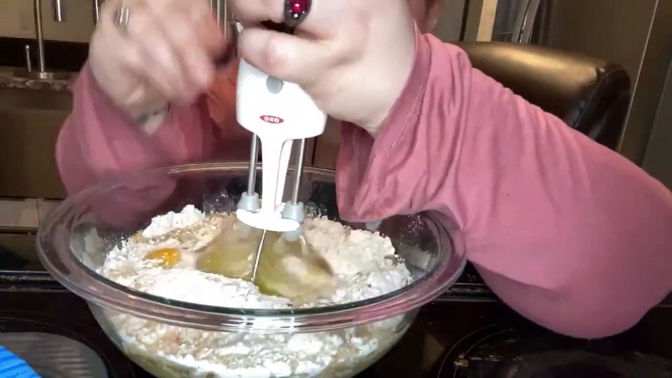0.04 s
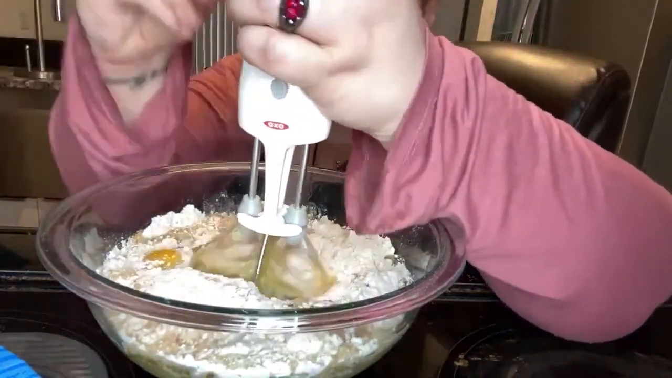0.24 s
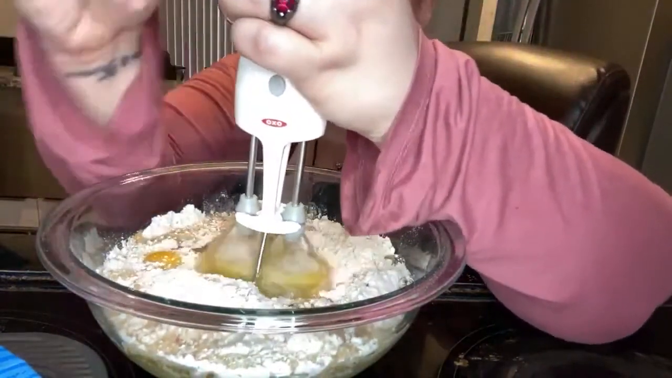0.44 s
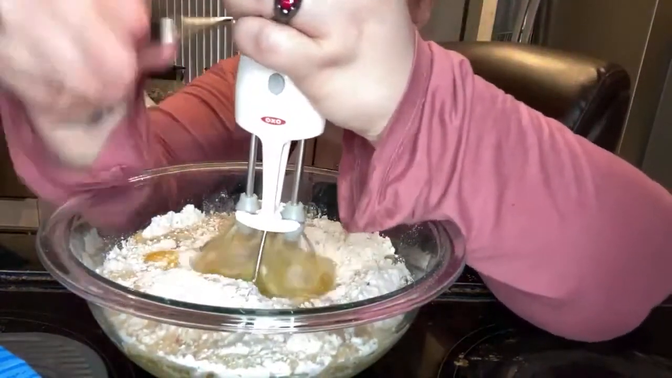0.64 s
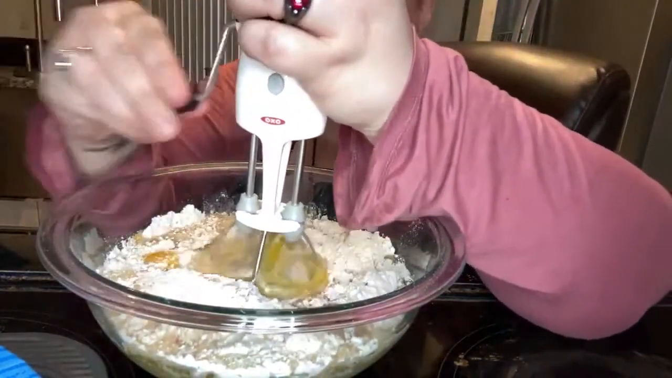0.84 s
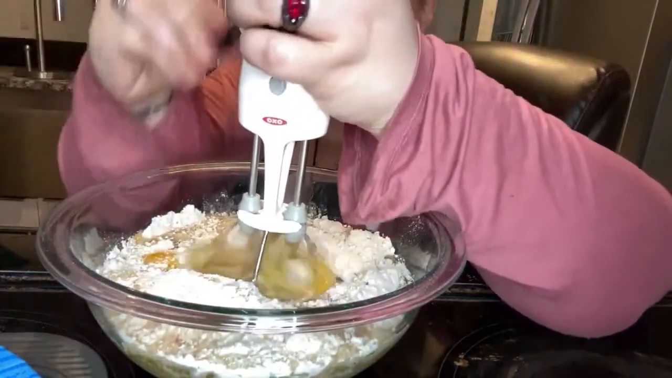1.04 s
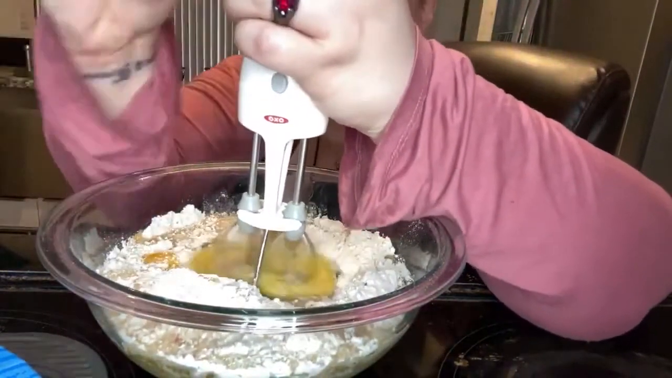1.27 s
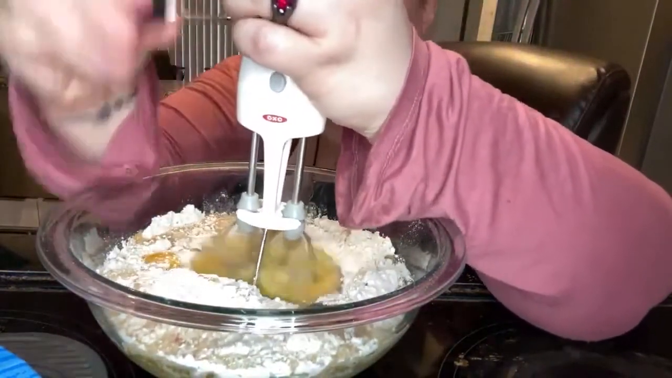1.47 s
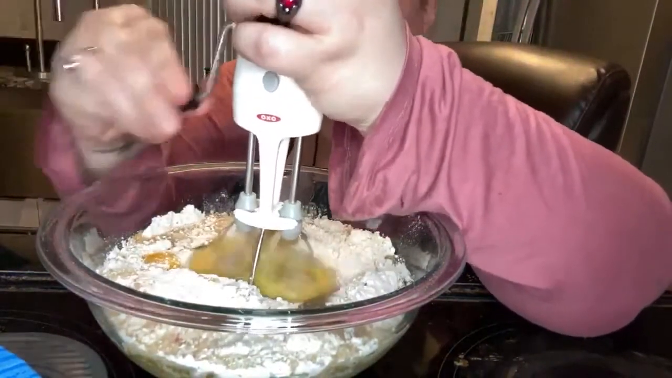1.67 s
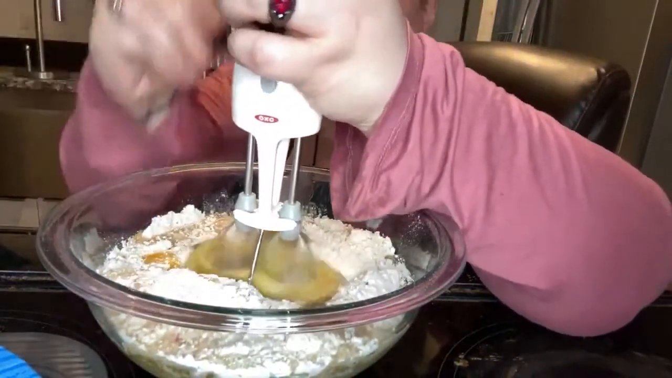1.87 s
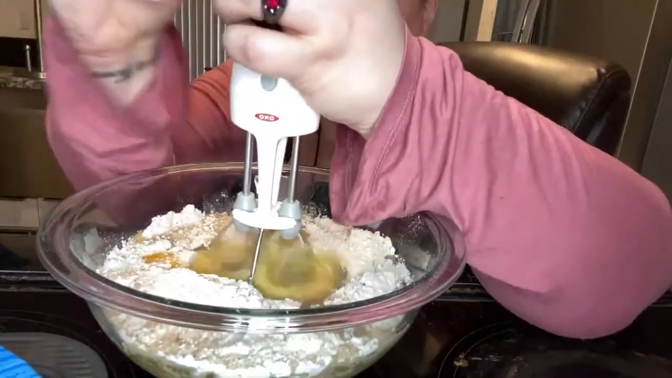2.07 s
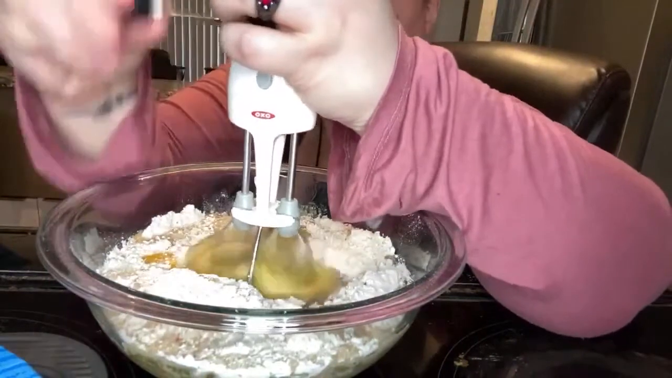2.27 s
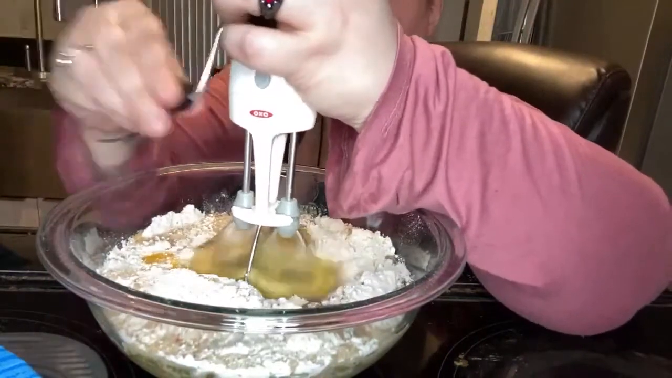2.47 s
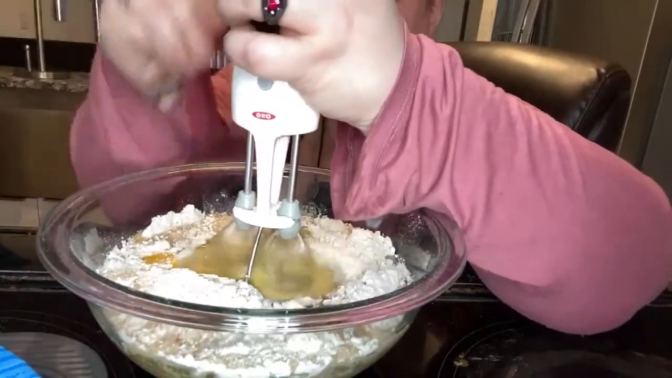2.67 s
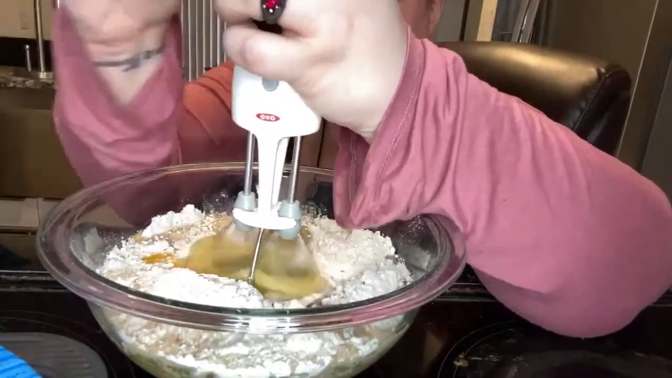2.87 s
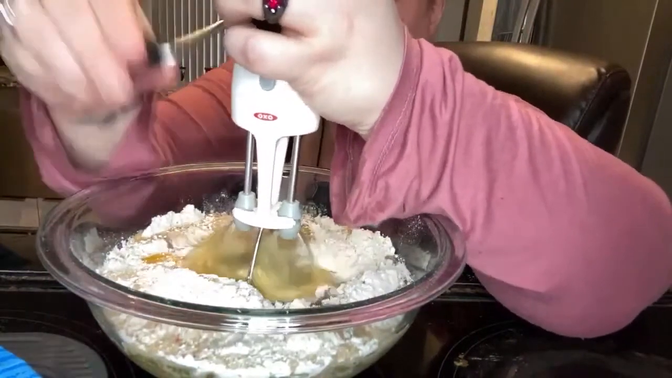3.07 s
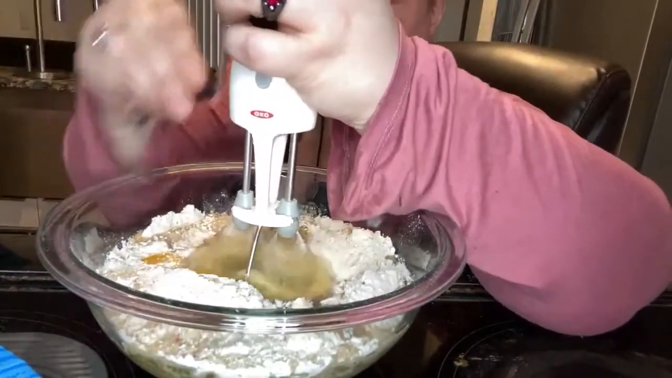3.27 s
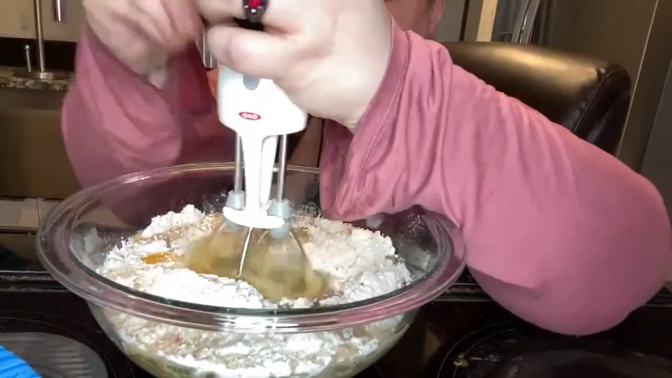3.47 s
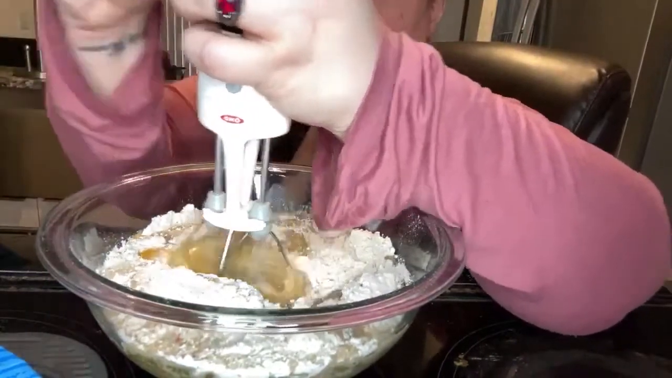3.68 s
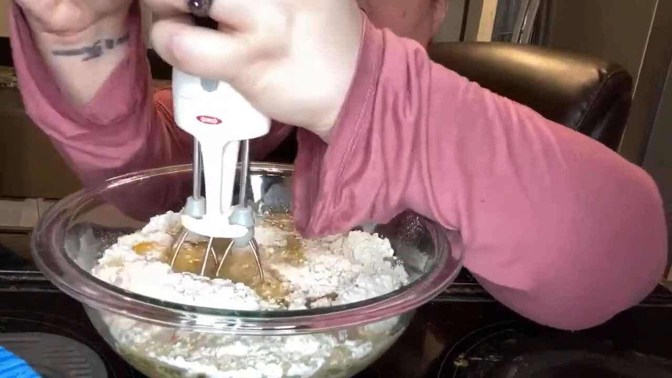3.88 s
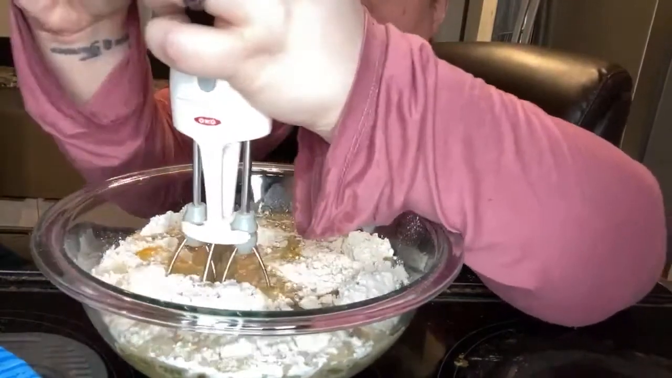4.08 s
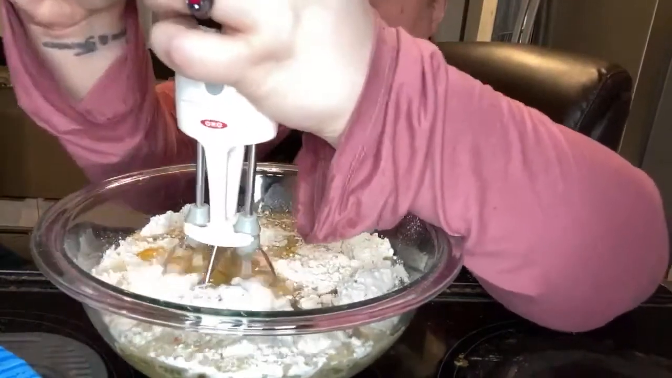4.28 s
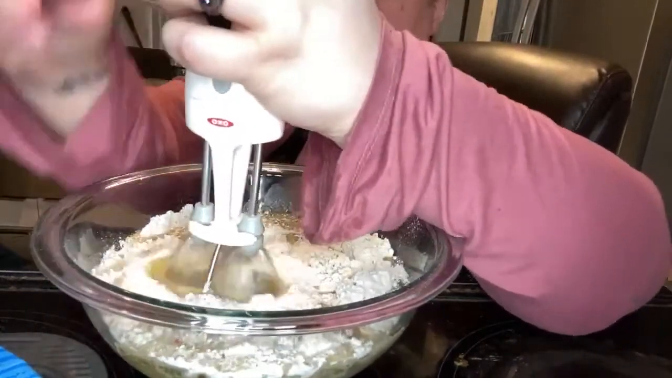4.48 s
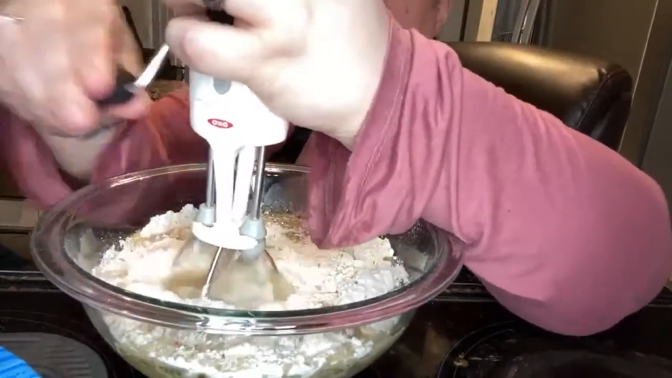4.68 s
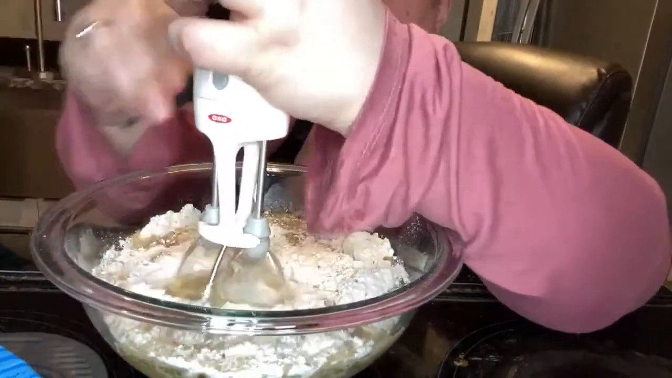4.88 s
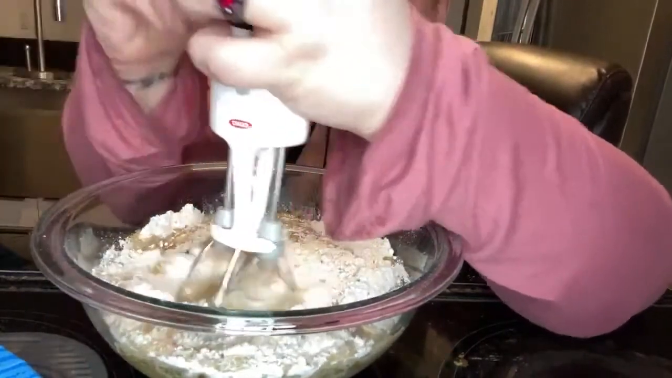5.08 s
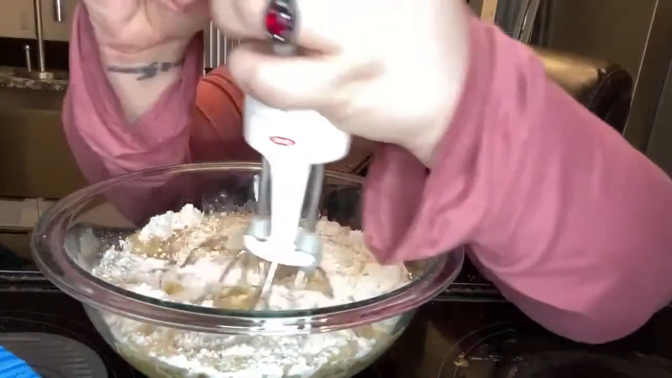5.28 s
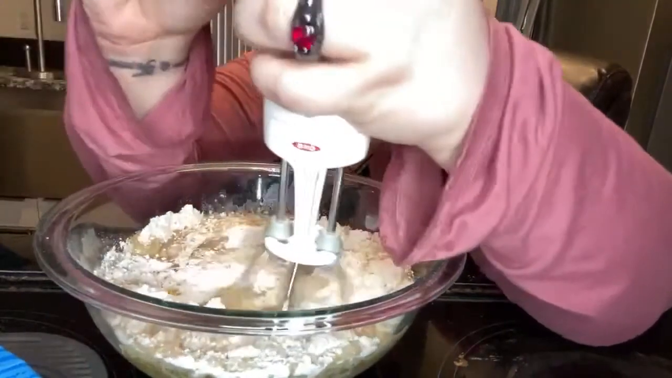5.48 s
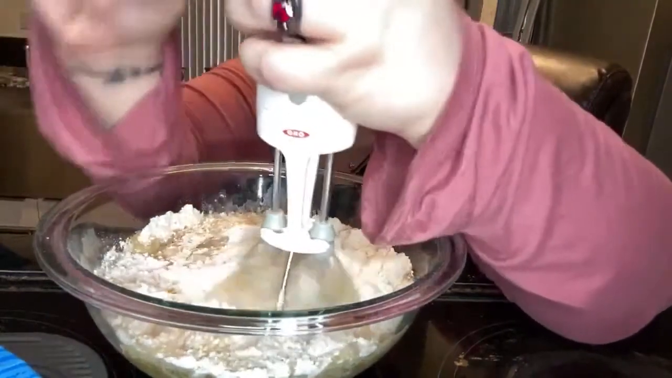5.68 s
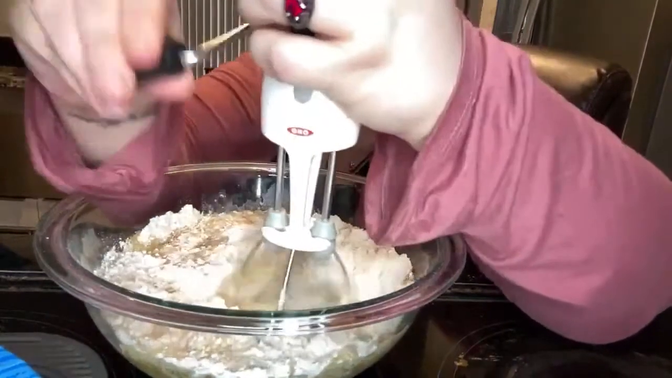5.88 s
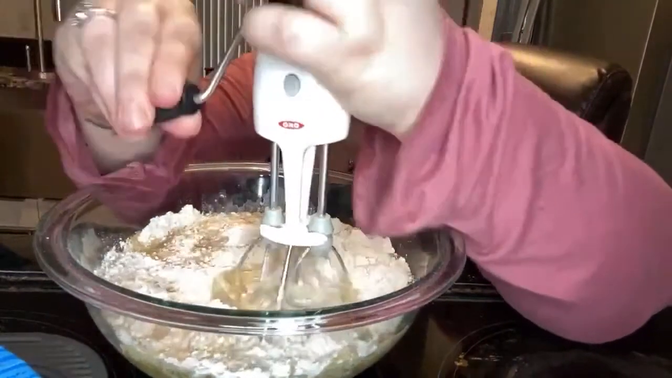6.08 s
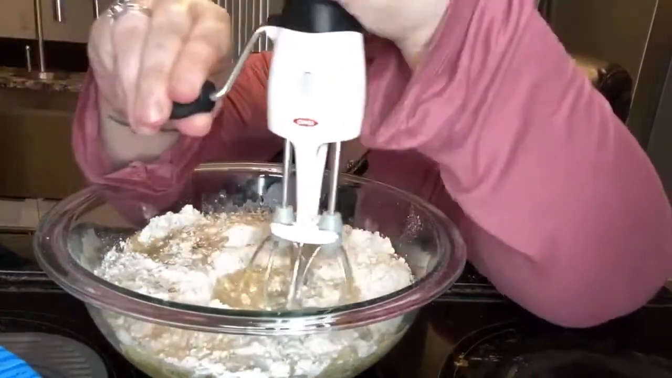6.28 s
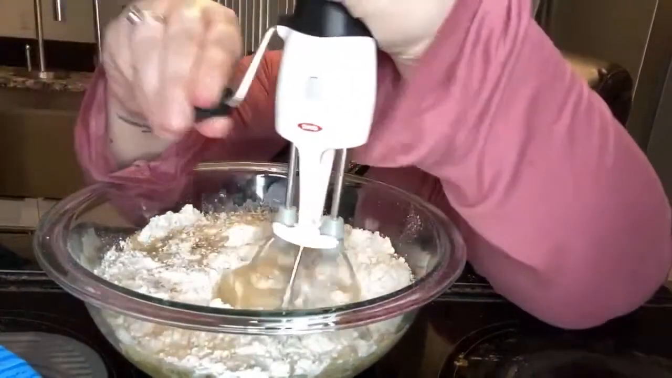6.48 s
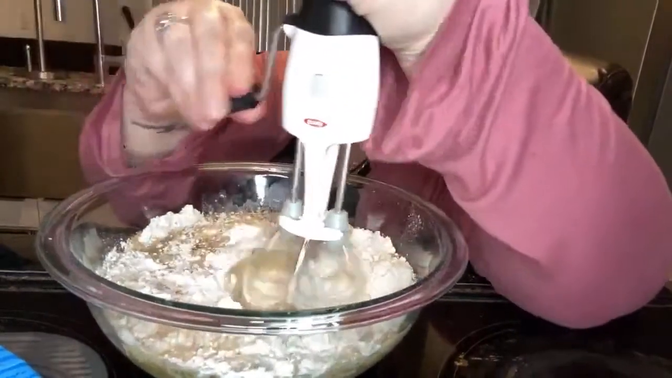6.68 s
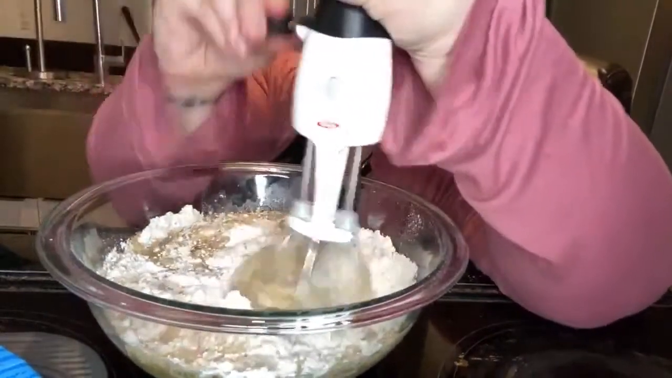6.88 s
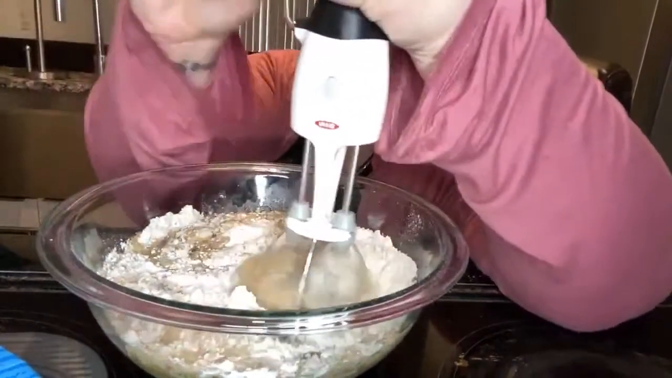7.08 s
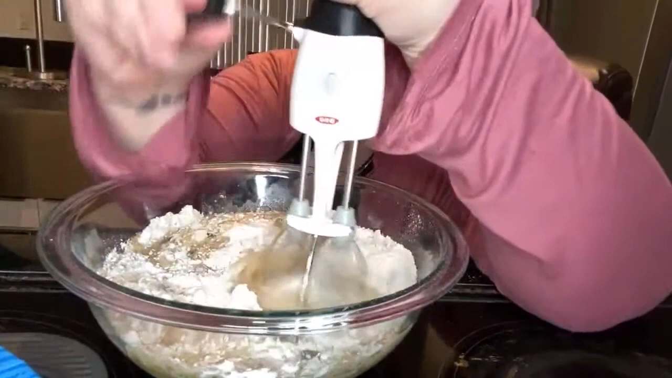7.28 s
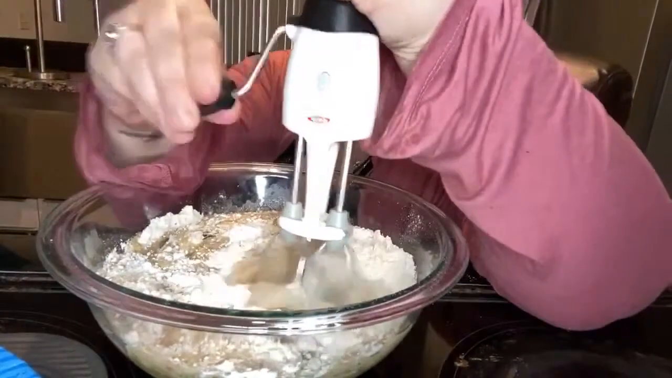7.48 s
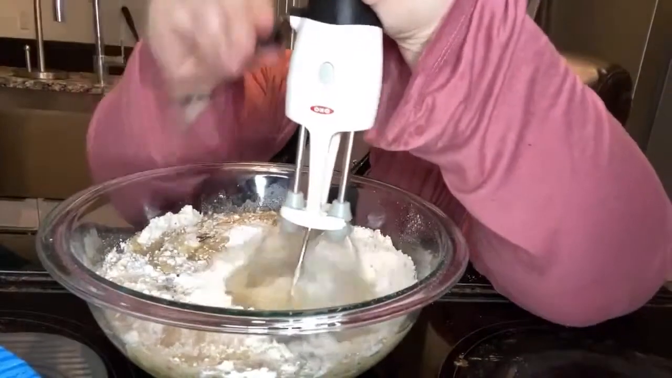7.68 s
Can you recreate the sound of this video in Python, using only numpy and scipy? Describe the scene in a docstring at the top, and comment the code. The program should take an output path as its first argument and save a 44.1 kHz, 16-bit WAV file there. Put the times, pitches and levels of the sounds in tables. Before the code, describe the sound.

A hand-cranked beater rasps and whirs in uneven pulses through wet batter in a glass bowl, clicking and spitting, with one hard knock.

```python
"""Hand-cranked beater in a glass bowl

A rotary beater churns eggs into flour, close up: toothed impacts drive housing resonances, swelling each turn.
Filtered grains make the wires fizz and drum; noise puffs and decaying modes make spits, slaps, ticks, bumps
and one hard knock on the bowl. Coloured noise and wavering tones hum behind; near the end all fades briefly.
"""
import sys
import numpy as np
from scipy import signal
from scipy.fft import rfft, irfft, next_fast_len
from scipy.io import wavfile
from scipy.ndimage import uniform_filter1d, map_coordinates

SR = 44100
rng = np.random.default_rng(int(sys.argv[2]) if len(sys.argv) > 2 else 0)


def to_wav(sig):
    """Store sig (one row per channel, or 1-D mono) as 16-bit WAV at the path in sys.argv[1].

    Samples outside -1..1 are clipped; the rate is SR.
    """
    pcm = np.clip(np.atleast_2d(sig), -1, 1) * 32767
    pcm = np.round(pcm).astype(np.int16)
    wavfile.write(sys.argv[1], SR, pcm.T)  # frames by channels


N = 341334
T = np.arange(N) / SR
BRIEF_T = T[:SR // 4]  # time axis of one short event
TOP_HZ = 15600

# beater turns at their hardest: t/s, gear surge/dB, housing ring surge/dB,
# lower minus upper housing resonance/dB, ring f/Hz
TURNS = [(.15, 11.5, 8.5, 7, 3065), (.38, 4.5, 4, -8, 3183), (.56, 7.5, 7, 0, 3060),
         (.718, 9, 9.5, 1, 2945), (.853, 10, 0, 5, 2980), (1.04, 2, 6, 2, 3030), (1.205, 8, 7.5, 4, 3121),
         (1.36, 6.5, 4, 1, 3101), (1.5, 6, 5, -1, 3026), (1.65, 4.5, 3, 0, 2945), (1.81, 7.5, 5.5, 6, 3083),
         (1.96, 8, 6, 3, 3070), (2.1, 7, 6, 4, 3084), (2.25, 9.5, -1, -5, 3063), (2.37, 8, 5, -1, 3055),
         (2.51, 4, 0, 3, 3000), (2.68, 7.5, 1.5, 1, 3115), (2.82, 8.5, 3, 6, 3230),
         (2.98, 8.5, 8, -3, 3115), (3.105, 9.5, 6, -4, 3120), (3.21, 4.5, 0, 4, 3080),
         (3.34, 5, 4, 7, 3000), (3.5, 7, 2, 2, 3117), (3.63, 5, -10, 3, 3100), (4.605, 6.5, -2, -1.5, 3030),
         (4.755, 11, 9.5, -0.5, 3080), (4.97, 8, 8, 5, 3120), (5.159, 8.5, 11, 0.5, 3050),
         (5.69, 6, 5, -10, 2920), (5.855, 4, 8.5, -7, 3040), (5.985, 3.5, 6, -2, 2985),
         (6.14, 7, 10, 0, 3100), (6.655, 4, 12.5, -6, 3099), (6.925, 0.5, 9.5, -3, 3040),
         (7.03, 5.5, 2, 8, 3120), (7.2, 0.5, -1, 5, 2981), (7.43, 3.5, 8.5, -1, 2970),
         (7.575, 5.5, 11, -2, 3090), (7.72, 0, 7.5, 0, 3040)]
# modes of the struck beater: f/Hz, t60/s, rel. level/dB
CLACK_MODES = [(754, .04, -30), (1000, 0.014, -25), (1109, .08, -30), (1200, .011, -15), (1390, .012, -4),
               (1590, 0.015, 2.5), (1770, 0.01, -1.5), (1910, 0.013, -5), (2050, .022, -3.5),
               (2920, 0.014, -0.5), (3510, .04, -24), (5373, .03, -20), (5680, .018, -10),
               (8070, 0.014, -14)]
# spectrum of a hard snap: f/Hz, rel. level/dB
SNAP_SPECTRUM = [(30, -47), (600, -2), (1500, 8.5), (3000, -3.5), (5500, 0), (8000, -6.5), (12000, -8),
                 (16000, -6.5)]
# spectrum of bursting froth: f/Hz, rel. level/dB
FIZZ_SPECTRUM = [(2000, 7), (3800, 5.5), (5000, -1.5), (6200, 1.5), (7000, 2), (7600, -7), (8200, 1),
                 (9000, 1), (11000, 2.5), (13000, 5), (14500, 4.5), (16000, -2)]
# spectrum of a wet smack: f/Hz, rel. level/dB
SLAP_SPECTRUM = [(200, -19), (600, 0), (1100, -1.5), (1600, 4.5), (2300, -10), (3200, -10.5), (4500, -25),
                 (9000, -32)]


def amp(db):
    """Decibels to gain."""
    return 10 ** (np.asarray(db) / 20)


def unit(x):
    """Scale to rms 1."""
    return x / np.sqrt(np.mean(x ** 2))


def peak(x, db):
    """Scale to a peak level."""
    return x * amp(db) / np.max(np.abs(x))


def curves(rows):
    """Each column of a table as a line through time."""
    times, *columns = np.transpose(rows)
    return [np.interp(T, times, column) for column in columns]


def add(out, s, x):
    """Mix a short sound in at time s."""
    i = int(s * SR)
    out[i:i + len(x)] += x[:N - i]


def walk(rate):
    """Smooth random curve of rms 1, from rate new values per second."""
    k = int(SR / rate)
    held = np.repeat(rng.standard_normal(N // k + 1), k)
    smooth = uniform_filter1d(uniform_filter1d(held, k), k)
    return unit(smooth[:N])


def colour(x, points):
    """Minimum-phase filter through (Hz, dB) points."""
    hz, db = np.transpose(points)
    size = next_fast_len(len(x) + 4096)
    size += size % 2
    f = np.maximum(np.arange(size // 2 + 1) * SR / size, 1)
    gain = amp(np.interp(np.log(f), np.log(hz), db))
    # a folded cepstrum makes the filter causal
    cepstrum = irfft(np.log(gain))
    cepstrum[1:size // 2] *= 2
    cepstrum[size // 2 + 1:] = 0
    return irfft(rfft(x, size) * np.exp(rfft(cepstrum)))[:len(x)]


def resonate(x, modes):
    """Drive (Hz, width Hz, dB) resonances, alternating in sign."""
    out = 0
    for k, (hz, width_hz, db) in enumerate(modes):
        b, a = signal.iirpeak(min(hz, TOP_HZ), hz / width_hz, SR)
        out = out + (-1) ** k * amp(db) * signal.lfilter(b, a, x)
    return out


def glide(x, hz, width_hz):
    """Drive a steep resonance whose pitch moves."""
    turn = np.exp(2j * np.pi * np.cumsum(hz) / SR)
    pole = np.exp(-np.pi * width_hz / SR)
    # shift the pitch to 0 Hz, filter there, shift back
    return np.real(turn * signal.lfilter([1], np.poly([pole, pole]), x / turn))


def bend(x, share, rate):
    """Let every pitch in a sound wander by a small share."""
    drift = share * unit(np.gradient(walk(rate)))
    return map_coordinates(x, [np.arange(N) + np.cumsum(drift)], order=3, mode="nearest")


def decay(t60):
    """A quarter second of exponential fall."""
    return np.exp(-np.log(1000) * BRIEF_T / t60)


def ring(modes):
    """Free ringing of (Hz, t60 s, dB) modes after a blow."""
    return sum(amp(db) * decay(t60) * np.sin(2 * np.pi * hz * BRIEF_T) for hz, t60, db in modes)


def burst(t60):
    """A dying puff of noise."""
    return decay(t60) * rng.standard_normal(SR // 4)


def swell(rise_s):
    """A puff of noise that builds for rise_s and dies away."""
    return rng.standard_normal(len(BRIEF_T)) * BRIEF_T * np.exp(-BRIEF_T / rise_s)


def grains(rate, spread_db):
    """Random impacts, rate per second, many small and a few large."""
    size = amp(spread_db * np.minimum(rng.exponential(size=N), 5))
    return unit((rng.random(N) < rate / SR) * size * rng.choice([-1, 1], N))


def surges():
    """The gears bind once a turn: their rasp and the housing's ring climb and let go again (dB)."""
    rise_s, fall_s = 0.077, 0.052
    total = 0
    for s, gear_db, ring_db, _, _ in TURNS:
        shape = np.interp(T, [s - rise_s, s, s + fall_s], [0, 1, 0])
        total = total + np.outer([gear_db, ring_db], shape)
    return total


def sweeps():
    """Swing between -1 and 1 twice a turn, as each of the two beaters digs in."""
    turn_s = .15
    times = np.transpose(TURNS)[0]
    # longer gaps between listed turns count as several turns
    turns = np.cumsum(np.maximum(np.round(np.diff(times, prepend=0) / turn_s), 1))
    return np.cos(2 * np.pi * 2 * np.interp(T, times, turns))


def gears(rasp_db, ring_db, push_db, ring_hz):
    """Teeth scrape past each other unevenly and shake the housing, which flexes in the grip."""
    tooth_hz, tooth_wander, mesh_depth = 90, 0.19, 0.27
    flutter_db, flex_share = 1.9, 0.016
    dry_db, overtone_db = -5.5, -12
    rasp_trim_db, ring_trim_db = -1.55, -1.5
    broad_width_hz, ring_width_hz = 590, 340
    clear_from_s, clear_over_s = 1.2, 3
    # housing resonances, lower and upper pair: f/Hz, width/Hz, rel. level/dB
    housing_low = [(1162, 65, 9.5), (1330, 130, 4.5)]
    housing_high = [(1665, 150, 6), (1900, 130, -5.5)]
    # fainter overtones of the ring: f/Hz, width/Hz, rel. level/dB
    overtones = [(3550, 450, -1), (4720, 240, 0)]
    # spectrum of the dry rasp: f/Hz, rel. level/dB
    rasp_spectrum = [(500, -24), (900, -17), (1300, 5), (1800, 2.5), (2100, -4.5), (2500, -12), (4000, -16),
                     (8000, -32)]

    phase = np.cumsum(tooth_hz * (1 + tooth_wander * walk(12))) / SR
    scrape = grains(rate=800, spread_db=2) * (1 + mesh_depth * np.cos(2 * np.pi * phase))

    # the circling hand rocks the housing between its two main resonances
    low_share = 1 / (1 + amp(-push_db) ** 2)
    low = unit(resonate(scrape * amp(flutter_db * walk(60)), housing_low)) * np.sqrt(low_share)
    high = unit(resonate(scrape * amp(flutter_db * walk(60)), housing_high)) * np.sqrt(1 - low_share)
    dry_rasp = unit(colour(grains(rate=2000, spread_db=4.5), rasp_spectrum))
    body = bend(low + high, flex_share, rate=25) + amp(dry_db) * dry_rasp

    # the ring is broad in thin egg and narrows as the batter thickens
    clear = np.clip((T - clear_from_s) / clear_over_s, 0, 1)
    broad = unit(glide(grains(rate=900, spread_db=3), ring_hz, broad_width_hz))
    narrow = unit(glide(scrape, ring_hz, ring_width_hz))
    sing = narrow * clear + broad * np.sqrt(1 - clear ** 2)
    sing = sing + amp(overtone_db) * unit(resonate(scrape, overtones))
    return body * amp(rasp_db + rasp_trim_db) + sing * amp(ring_db + ring_trim_db)


def rattle():
    """Loose shafts chatter against the frame; each tap rings the wires in another mix."""
    tap_db = -12
    # modes of wires and shafts: f/Hz, width/Hz, rel. level/dB
    wire_modes = [(794, 70, -0.5), (1074, 76, -1.5), (1320, 96, -2), (1570, 91, 1), (1910, 120, -7),
                  (2540, 230, -6.5), (3490, 180, -7.5)]
    # loose play of the shafts: t/s, rms level of the ringing wires/dB
    looseness = [(0, -62.5), (2.9, -60), (3.3, -56), (3.9, -63), (5.5, -77), (5.85, -55), (6.4, -70),
                 (6.85, -61), (7.2, -59), (7.6, -59), (7.74, -58)]
    taps = grains(rate=70, spread_db=2)
    wires = sum(resonate(taps * rng.standard_normal(N), [mode]) for mode in wire_modes)
    loose_db, = curves(looseness)
    return (unit(wires) + amp(tap_db) * unit(colour(taps, SNAP_SPECTRUM))) * amp(loose_db)


def batter(fizz_db, rumble_db, slosh_db):
    """The wires whip up fine froth, slap the egg about and drum on the bowl through it."""
    slosh_trim_db, crackle_db, drum_sway_db, froth_flutter_db = -2, -8, 0.8, 1.0
    # spectra of bowl drumming and of slosh: f/Hz, rel. level/dB
    rumble_spectrum = [(40, -34.5), (70, -2), (120, 9.5), (170, 8.5), (240, 2.5), (330, -4), (450, -15),
                       (900, -31.5), (4000, -69)]
    slosh_spectrum = [(250, -11), (420, 6), (520, 0), (650, 0), (820, 3), (1100, -0.5), (2000, -21),
                      (8000, -41)]
    froth = unit(colour(grains(rate=10000, spread_db=1.0), FIZZ_SPECTRUM)) * amp(froth_flutter_db * walk(60))
    # small bubbles of each size burst on their own
    bubble_hz = np.geomspace(4500, 14500, 8)
    crackle = unit(sum(resonate(grains(rate=60, spread_db=3.5), [(hz, hz / 7, 0)]) for hz in bubble_hz))
    fizz = (froth + amp(crackle_db) * crackle) * amp(fizz_db)
    # the drumming on the bowl swells and sinks unevenly
    rumble = colour(grains(rate=170, spread_db=1.5), rumble_spectrum) * amp(drum_sway_db * walk(14))
    slosh = colour(grains(rate=1200, spread_db=2.5), slosh_spectrum)
    return fizz + unit(rumble) * amp(rumble_db) + unit(slosh) * amp(slosh_db + slosh_trim_db)


def stalls():
    """The beaters jam and the crank stands still: the level drops for a moment (dB)."""
    ramp_s = 0.011
    # jams: t/s, length/s, level change/dB
    jams = [(5.726, 0.04, -10), (6.026, 0.02, -5)]
    total = 0
    for s, length_s, db in jams:
        corners = np.cumsum([s - ramp_s, ramp_s, length_s, ramp_s])
        total = total + np.interp(T, corners, [0, db, db, 0])
    return total


def knocks():
    """The beater grazes the glass, hits it, and the heavy bowl thumps on the counter; soft bumps besides."""
    crack_t60, rattle_t60, rattle_db = 0.026, 0.11, -8.5
    bump_t60, bump_trim_db = 0.11, -1
    push_s, contact_s = 0.0064, 0.00046
    # blows of the one hard knock: t/s, crack/dB, clack/dB, thump/dB
    blow_table = [(6.0504, -22.5, -50, -62), (6.0533, -23, -11.5, -37), (6.055, -28, -27, -13.5)]
    # soft bumps through the counter: t/s, peak level before trim/dB, f/Hz
    bump_table = [(1.875, -43, 52), (2.555, -47, 52), (2.98, -32.5, 155), (2.985, -36, 83), (3.1, -38, 120),
                  (3.2, -31.5, 120), (3.255, -34, 157), (3.36, -32.5, 156), (4.57, -34, 133),
                  (5.608, -28, 168), (5.745, -28.5, 177), (5.835, -30, 172), (5.87, -33, 128),
                  (6.535, -32.5, 87), (6.595, -31, 116), (6.869, -31.5, 111), (6.91, -36, 83.5),
                  (7.029, -33, 100), (7.095, -33, 119), (7.2, -35, 135), (7.315, -33, 133),
                  (7.391, -32.5, 91), (7.56, -32, 84.6)]
    # modes of the filled bowl: f/Hz, t60/s, rel. level/dB
    bowl_modes = [(135, .084, -11), (172, .12, 1.5), (230, .11, 2), (300, 0.056, -2), (350, .05, -10),
                  (427, 0.15, -18)]
    out = np.zeros(N)
    # keep the thump above the deep bass
    highpass = signal.butter(4, 115, "highpass", fs=SR, output="sos")
    thump = signal.sosfilt(highpass, ring(bowl_modes))
    clack = ring(CLACK_MODES) * (1 - np.exp(-BRIEF_T / contact_s))
    for s, crack_db, clack_db, thump_db in blow_table:
        # the bright crack dies first, the shaken batter a little later
        crack = peak(colour(burst(crack_t60), SNAP_SPECTRUM), 0)
        crack = crack + peak(colour(burst(rattle_t60), SLAP_SPECTRUM), rattle_db)
        add(out, s, crack * amp(crack_db) + peak(clack, clack_db) + peak(thump, thump_db))
    # a soft push builds up slowly
    push = (1 - np.exp(-BRIEF_T / push_s)) ** 2
    for s, db, hz in bump_table:
        add(out, s, peak(ring([(hz, bump_t60, 0)]) * push, db + bump_trim_db))
    return out


def ticks():
    """A wire catches and springs free: a snap and a short, damped ring."""
    snap_t60, snap_trim_db, start_delay_s = 0.0079, 6.5, .0008
    frame_db, frame_t60 = -14, .022
    # wires and gears catching: t/s, ring peak level/dB, ring f/Hz,
    # snap rel. to ring before trim/dB, ring t60/s
    tick_table = [(.638, -34, 2900, -16, .012), (.891, -37, 2800, -6, .008),
                  (1.559, -24.5, 2970, -10, .009), (1.5593, -32, 2150, -24, .012),
                  (1.564, -34, 2700, -14, .008), (1.571, -30, 2360, -18, .012),
                  (1.688, -35, 2700, -14, .012), (2.2145, -24, 2200, -18, .018),
                  (2.353, -24.5, 2800, -8, .009), (2.373, -31, 2300, -14, .014),
                  (2.4848, -31, 1610, -11, .012), (2.4955, -25.5, 1620, -13, 0.021),
                  (2.5196, -30.5, 2100, -4, .006), (3.003, -31.5, 1770, -10, 0.012),
                  (3.128, -16.5, 2100, -12.5, 0.0084), (3.164, -39, 1150, 6, .012),
                  (3.1913, -33.5, 1170, 0.5, .012), (3.2162, -23, 1770, -18, .016),
                  (3.252, -28, 2200, -20, .012), (3.272, -20.5, 1930, -6, 0.015),
                  (3.2925, -36, 2500, -3, .006), (3.325, -24, 1780, -23, .014),
                  (3.3873, -26.5, 1900, -12, .009), (3.3895, -28, 2100, -24, .014),
                  (3.778, -35, 3100, -7, .016), (5.751, -24.5, 1680, -24, .016),
                  (5.7515, -35, 3160, -20, .016), (6.321, -30, 1630, -11, 0.012),
                  (6.343, -39, 980, -6, .016), (6.677, -36.5, 1670, -8, 0.014),
                  (6.856, -32, 1600, -13, .016), (6.879, -25, 1500, -15, 0.015),
                  (7.021, -37, 1400, -5, .01), (7.055, -37, 1250, -24, .016), (7.226, -36.5, 2200, -7, .01),
                  (7.283, -35.5, 3000, -7, 0.016), (7.306, -34, 1600, -8, .012),
                  (7.356, -30, 1600, -13, 0.02), (7.381, -36, 3600, -7, 0.015),
                  (7.392, -28, 1520, -18, .022), (7.493, -31, 3000, -10, .016),
                  (7.548, -32, 1780, -17, .018), (7.560, -34.5, 1250, -20, .018),
                  (7.6245, -40, 4500, -10, .008), (7.6458, -24, 1630, -19, .022),
                  (7.664, -40, 3300, -4, .008)]
    out = np.zeros(N)
    frame = amp(frame_db) * ring(CLACK_MODES) * decay(frame_t60)
    for s, db, hz, bright_db, ring_t60 in tick_table:
        body = ring([(hz, ring_t60, 0)]) + frame
        snap = peak(colour(burst(snap_t60), SNAP_SPECTRUM), bright_db + snap_trim_db)
        add(out, s + start_delay_s, (peak(body, 0) + snap) * amp(db))
    return out


def slaps():
    """Batter cushions the wire: a soft smack and a spray of droplets."""
    rise_s, spray_trim_db = 0.0039, -1
    spray_spectrum = [(1000, -25), (3000, 1.0), (6500, -0.5), (10000, -4.5), (15000, -2.5)]  # f/Hz, level/dB
    # wires slapping deep batter: t/s, smack peak level/dB, spray rel. to smack before trim/dB
    slap_table = [(.862, -41, -4), (2.37, -32, -12), (5.676, -41, 2), (5.840, -36, -5), (5.856, -33.5, -1),
                  (5.904, -34, -5), (6.157, -47, 3), (6.674, -43.5, 3), (6.854, -37, -1), (6.877, -39, -16),
                  (6.927, -35.5, 1.5), (6.986, -36, -17), (7.020, -40, 1.5), (7.052, -36, -25),
                  (7.086, -39, -18), (7.139, -43.5, 3.5), (7.224, -43.5, 3), (7.278, -40, 5),
                  (7.304, -41, -8), (7.353, -39, -10), (7.378, -42.5, 6.5), (7.389, -34, -13),
                  (7.453, -32, -4.5), (7.544, -31, -12), (7.599, -40, 1)]
    out = np.zeros(N)
    for s, db, spray_db in slap_table:
        smack = peak(colour(swell(rise_s), SLAP_SPECTRUM), 0)
        spray = peak(colour(swell(rise_s), spray_spectrum), spray_db + spray_trim_db)
        add(out, s, (smack + spray) * amp(db))
    return out


def spits():
    """A film of egg tears in a few milliseconds and rings its little cavity."""
    t60, width_share, splash_db, start_delay_s = 0.014, 0.094, -16, .001
    # wet films bursting: t/s, peak level/dB, f/Hz
    spit_table = [(0.214, -33, 5130), (0.6903, -34, 12600), (0.8585, -37, 4640), (0.8914, -33, 13900),
                  (0.9344, -32, 13100), (1.0286, -36, 10900), (1.288, -28.5, 12600), (1.4476, -32, 12200),
                  (1.489, -29, 12700), (1.557, -39, 12800), (1.905, -30.5, 12800), (2.193, -30, 12400),
                  (2.355, -19.5, 8000), (2.356, -23, 9600), (2.362, -37, 13500), (2.519, -21.5, 13200),
                  (2.766, -27.5, 12400), (2.822, -33.5, 9050), (2.88, -31.5, 13700), (3.127, -30, 12700),
                  (3.2718, -26, 6100), (3.272, -31, 11500), (3.336, -33, 12400), (3.387, -25, 13200),
                  (3.409, -39, 14800), (3.6686, -37, 12000), (3.779, -28.5, 6200), (4.215, -37, 10800),
                  (5.011, -40, 11900), (5.3462, -45, 14400), (5.7449, -30.5, 9050), (6.0157, -37, 12500),
                  (6.2951, -37, 12000), (6.6774, -33.5, 6930), (6.903, -35, 14100), (7.0903, -32.5, 10200),
                  (7.1924, -29, 11100), (7.348, -28, 13800), (7.664, -33, 10900)]
    out = np.zeros(N)
    for s, db, hz in spit_table:
        tear = burst(t60) * rng.exponential(size=SR // 4)
        cavity = resonate(tear, [(hz, hz * width_share, 0)])
        splash = amp(splash_db) * colour(tear, FIZZ_SPECTRUM)
        add(out, s + start_delay_s, peak(cavity + splash, db))
    return out


def plops():
    """An air pocket rings as it opens, rising in pitch."""
    t60, rise_share, open_s = 0.025, 0.21, 0.0005
    # air pockets opening: t/s, peak level/dB, starting f/Hz
    plop_table = [(2.169, -36, 1820), (3.294, -25.5, 1310), (6.988, -34, 900), (6.992, -30, 1060),
                  (7.055, -37, 1070), (7.156, -38, 1160), (7.161, -35, 1020), (7.4935, -25, 1490),
                  (7.521, -34, 1060), (7.607, -33.5, 1500)]
    out = np.zeros(N)
    envelope = decay(t60) * (1 - np.exp(-BRIEF_T / open_s))
    for s, db, hz in plop_table:
        phase = np.cumsum(hz * (1 + rise_share * np.minimum(BRIEF_T / t60, 1))) / SR
        add(out, s, peak(np.sin(2 * np.pi * phase) * envelope, db))
    return out


def squeaks():
    """A dry shaft rubs in its bearing for a moment, always at the same high pitch."""
    rub_s = 0.0029
    shaft_modes = [(6150, 330, 0), (8300, 500, -12)]  # f/Hz, width/Hz, level/dB
    # squeaks: t/s, peak level/dB
    squeak_table = [(.396, -49), (.725, -39), (0.781, -35.5), (1.054, -47), (1.112, -39), (1.201, -46),
                    (1.325, -49), (1.358, -53), (1.556, -47), (1.695, -39), (1.718, -49), (3.637, -46.5),
                    (4.655, -47.5), (5.047, -53), (5.677, -43.5), (6.930, -40.5), (7.113, -42.5)]
    out = np.zeros(N)
    for s, db in squeak_table:
        add(out, s, peak(resonate(swell(rub_s), shaft_modes), db))
    return out


def room(x):
    """Cupboards and counter return a short, dull tail."""
    t60, build_t60, wet_db = 0.11, 0.0088, -15
    spectrum = [(200, -9.0), (2500, -4.0), (12000, -9.5)]  # f/Hz, level/dB
    tail = colour(burst(t60) * (1 - decay(build_t60)), spectrum)
    tail = tail / np.sqrt(np.sum(tail ** 2))
    return x + amp(wet_db) * signal.fftconvolve(x, tail)[:N]


def kitchen():
    """An appliance's fan noise with wavering motor tones."""
    air_db, throb_db = -47.5, 1.8
    # fan noise spectrum: f/Hz, rel. level/dB
    air_spectrum = [(25, -67.5), (45, -28), (72, -3), (97, -10), (150, -4), (205, -5), (236, -1.5),
                    (270, -5.5), (310, -7), (380, -10), (463, -12.5), (650, -18.5), (1070, -18.5),
                    (1700, -19.5), (2110, -28), (2800, -27.5), (5000, -36), (7700, -42.5), (16000, -83.5)]
    # motor tones: f/Hz, rms level/dB, waver share
    hum_table = [(82.8, -49.5, 0.72), (111, -57.5, .5), (126, -55.5, .7), (193.3, -56.5, 0.36),
                 (229, -60, 0.65), (275.9, -52.5, .25), (303.1, -48.5, 0.088), (331.7, -60.5, 0.55),
                 (343, -62.5, .5), (993, -72, .25), (1765, -68.5, .22)]
    air = colour(rng.standard_normal(N), air_spectrum)
    # the low drone throbs unevenly, the hiss above it stays smooth
    drone = resonate(air, [(260, 200, 0)])
    out = unit(air + drone * (amp(throb_db * walk(16)) - 1)) * amp(air_db)
    for hz, db, waver in hum_table:
        sway = 1 + waver * (walk(9) + 1j * walk(10))
        tone = np.real(sway * np.exp(2j * np.pi * hz * T))
        out = out + unit(tone) * amp(db)
    return out


def scene():
    """Beater, batter and bowl in the humming kitchen."""
    easy_effort_db, easy_slosh_db = -51, -57
    ring_base_db, ring_per_effort, ring_per_slosh = -62.5, 1.15, 0.43  # slopes in dB per dB
    ring_rise_db_per_s = .5
    slosh_per_surge, fizz_per_surge = 0.61, 0.084  # dB per dB
    sweep_ring_db, sweep_fizz_db = 2.5, 1
    ring_flutter_db, fizz_flutter_db = 2.0, 2.06
    # effort at the crank, sagging where the cranking eases between bursts: t/s, base gear level/dB
    effort = [(0, -53), (.3, -52.5), (.7, -49.5), (1.0, -51), (1.55, -48), (1.8, -51), (2.25, -49.5),
              (2.9, -50.5), (3.2, -47), (3.55, -50.5), (3.75, -56), (3.95, -61), (4.38, -65), (4.57, -46.5),
              (4.84, -58), (4.95, -54), (5.05, -54.5), (5.18, -51.5), (5.28, -67), (5.6, -67), (5.68, -51),
              (5.87, -46.5), (6.02, -53), (6.2, -61.5), (6.55, -61), (6.9, -55), (7.74, -51.5)]
    # depth of the wires in the batter: t/s, bowl rumble level/dB, base slosh level/dB
    depth = [(0, -44, -56), (.35, -51, -53.5), (.68, -45.5, -56.5), (1.6, -43, -56), (1.8, -47.5, -57),
             (2.35, -45, -53), (2.9, -48.5, -54.5), (3.2, -45, -53.5), (3.8, -50.5, -51),
             (4.38, -52.5, -62), (4.6, -43, -55), (4.85, -52.5, -61.5), (5.2, -43, -54.5), (5.48, -58, -65),
             (5.7, -43.5, -56), (5.87, -43, -59), (6.1, -41.5, -53), (6.3, -49, -62), (6.6, -44, -62.5),
             (7.03, -42, -46.5), (7.3, -43.5, -53), (7.74, -54, -50)]
    # froth whipped up by the wires: t/s, base fizz level/dB
    froth = [(0, -56.5), (.35, -59), (.75, -53), (1.05, -56.5), (1.55, -53), (1.85, -57), (2.3, -52.5),
             (2.65, -55), (2.95, -53.5), (3.25, -50.5), (3.5, -52.5), (3.7, -63), (3.95, -64),
             (4.38, -73.5), (4.56, -50.5), (4.67, -55.5), (4.75, -60.5), (4.84, -62.5), (4.98, -58.5),
             (5.06, -59), (5.16, -54.5), (5.28, -67), (5.6, -67.5), (5.68, -51), (5.78, -51.5), (5.86, -48),
             (6.02, -58.5), (6.22, -63), (6.55, -64), (6.68, -59.5), (6.87, -56.5), (7.05, -56.5),
             (7.4, -54), (7.74, -54.5)]

    effort_db, = curves(effort)
    rumble_db, slosh_db = curves(depth)
    froth_db, = curves(froth)
    *_, push_db, ring_hz = curves(TURNS)
    surge_db, ring_surge_db = surges()
    sweep = sweeps()

    # deep batter strains the frame, and it rings more as the batter thickens
    strain_db = ring_per_slosh * (slosh_db - easy_slosh_db) + ring_rise_db_per_s * T
    # harder cranking rings the housing more
    ring_db = ring_base_db + ring_per_effort * (effort_db - easy_effort_db) + strain_db
    ring_db = ring_db + ring_surge_db + sweep_ring_db * sweep + ring_flutter_db * walk(25)
    fizz_db = froth_db + fizz_per_surge * surge_db + sweep_fizz_db * sweep + fizz_flutter_db * walk(20)

    whir = gears(effort_db + surge_db, ring_db, push_db, ring_hz)
    churn = batter(fizz_db, rumble_db, slosh_db + slosh_per_surge * surge_db)
    turning = (whir + rattle() + churn) * amp(stalls())
    blows = ticks() + squeaks() + knocks() + slaps() + spits() + plops()
    return (room(turning + blows) + kitchen())[None]


def record(dry):
    """The level fades away once and snaps back; the top is cut."""
    fade_s, fade_db_per_s = 6.70, 489
    return_s, return_takes_s = 6.806, 0.01
    still_faded = np.clip(1 - (T - return_s) / return_takes_s, 0, 1)
    fade_db = -fade_db_per_s * np.maximum(T - fade_s, 0) * still_faded
    lowpass = signal.ellip(10, .2, 70, TOP_HZ, fs=SR, output="sos")
    return signal.sosfilt(lowpass, dry * amp(fade_db))


dry = scene()
out = record(dry)
to_wav(out)
```